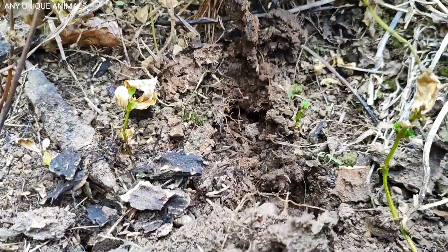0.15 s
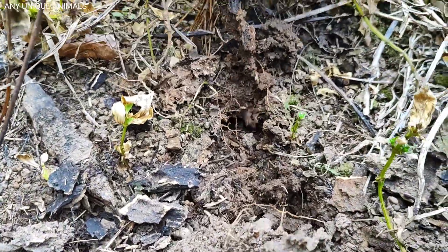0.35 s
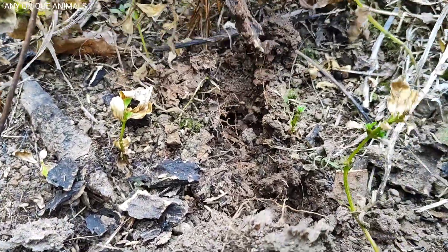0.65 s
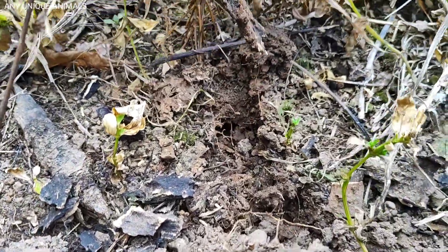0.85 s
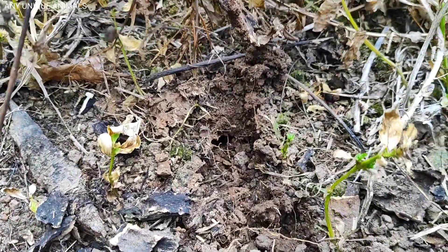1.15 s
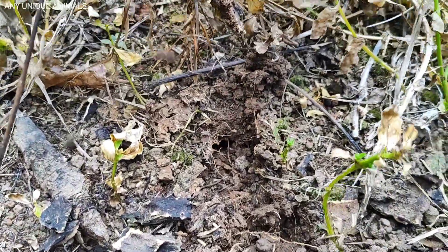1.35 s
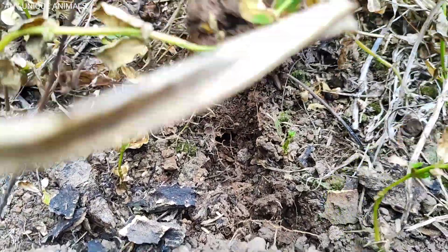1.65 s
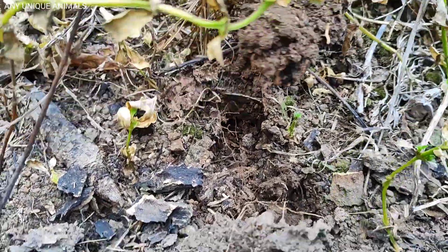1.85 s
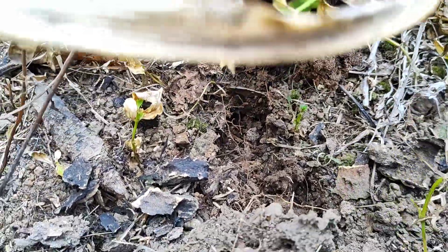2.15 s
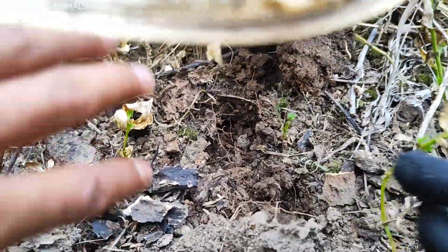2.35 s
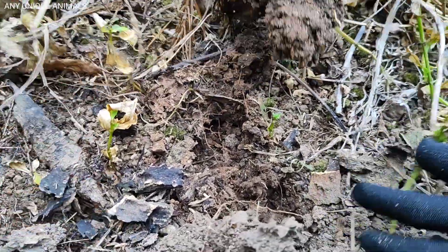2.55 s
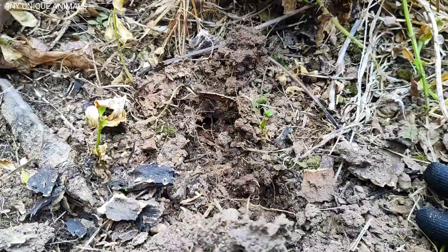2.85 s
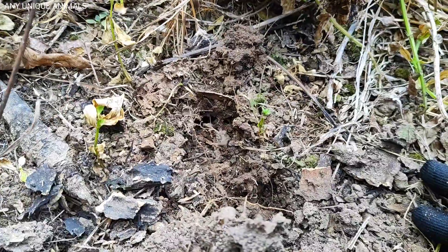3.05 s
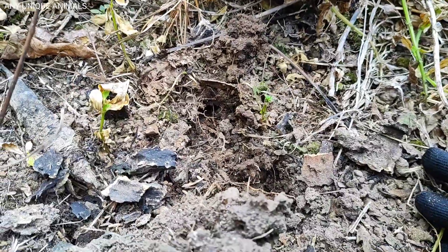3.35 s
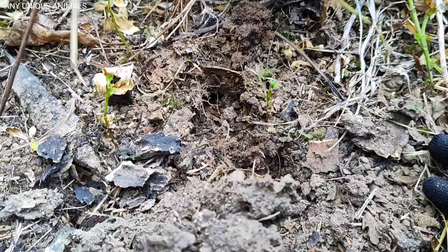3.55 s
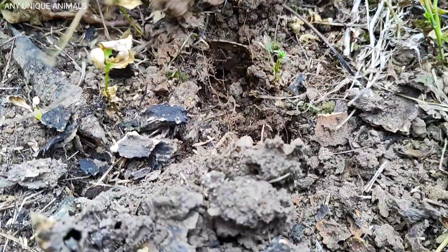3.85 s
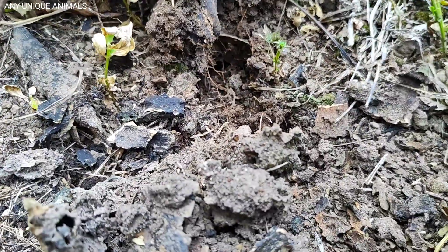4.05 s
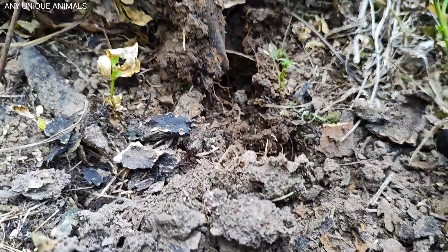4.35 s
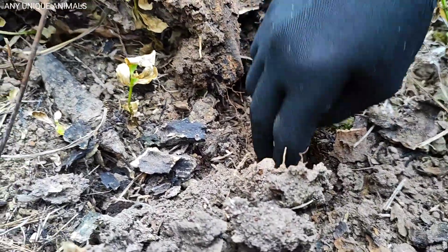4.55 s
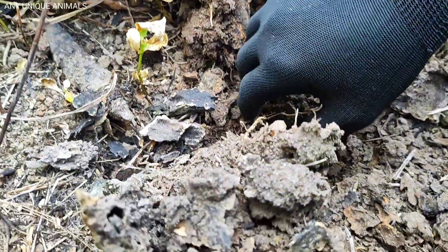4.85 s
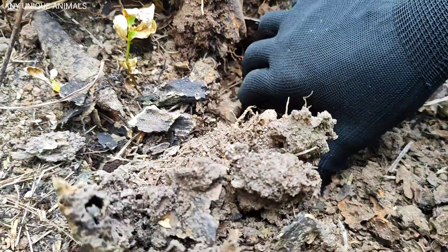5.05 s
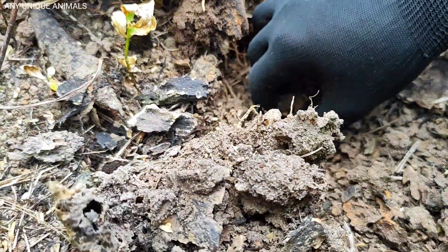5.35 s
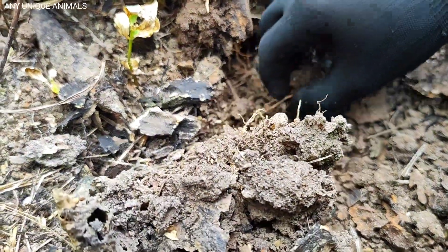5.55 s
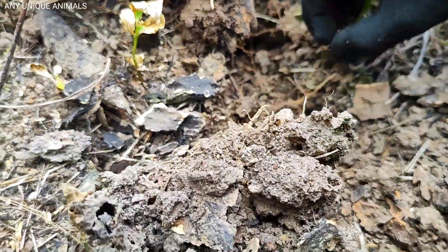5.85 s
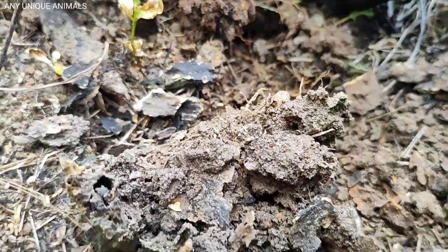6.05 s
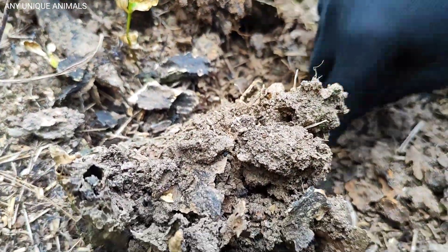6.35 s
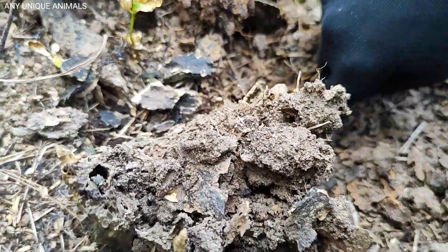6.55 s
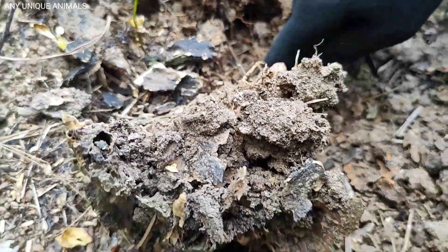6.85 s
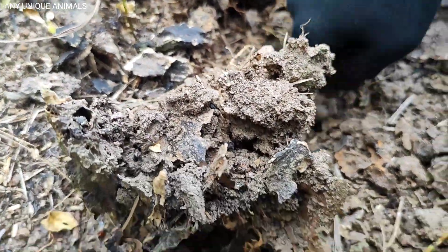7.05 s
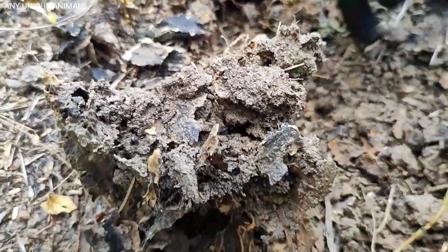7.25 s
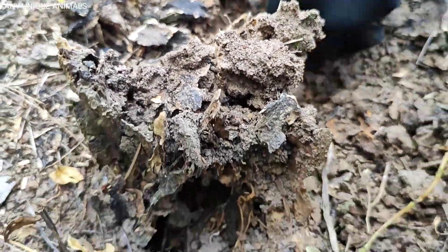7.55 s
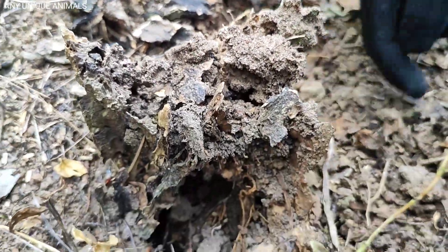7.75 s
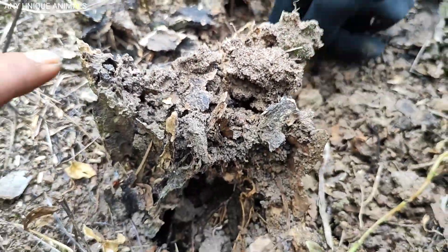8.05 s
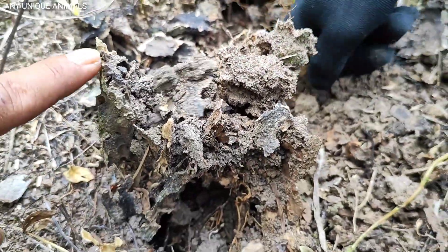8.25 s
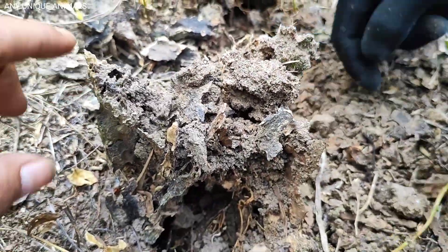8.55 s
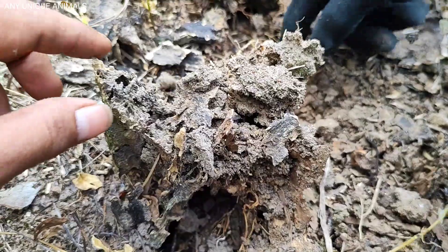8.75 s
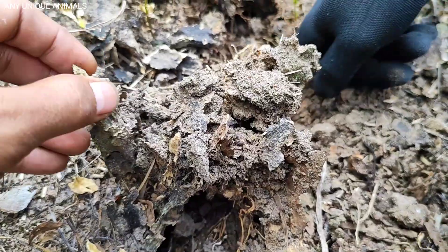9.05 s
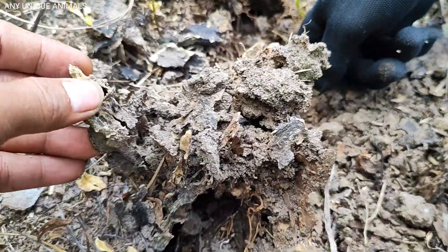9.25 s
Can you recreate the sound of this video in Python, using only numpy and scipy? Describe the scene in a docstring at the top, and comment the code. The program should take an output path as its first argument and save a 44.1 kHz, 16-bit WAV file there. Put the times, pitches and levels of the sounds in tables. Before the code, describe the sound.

Crisp leaf crackle, pattering dirt and sharp woody cracks build to a crunching tear, then thin into sparse picking while a bird chirps.

```python
"""Woodland floor: hands break rotten wood and dig through dry soil and leaf litter, close to a phone.
Leaves crackle and crumbs patter (noise gated by random ticks); wood and twigs crack (short fibre bursts)
and tear; loose wood knocks (decaying tones). A bird whistles short phrases and two long, faint, thin tones
sound near 7.9 kHz, perhaps an insect (all gliding sines with echoes), over a far rumble and drone (noise).
The two microphone ports colour the treble differently."""
import sys
import numpy as np
from scipy import signal
from scipy.fft import rfft, irfft, next_fast_len
from scipy.io import wavfile
from scipy.ndimage import uniform_filter1d, map_coordinates

SR = 44100
rng = np.random.default_rng(int(sys.argv[2]) if len(sys.argv) > 2 else 0)


def dump_mix(stems):
    """Bounce the given channels to the path in sys.argv[1] as a 16-bit WAV at rate SR."""
    frames = np.atleast_2d(stems).T  # one column per channel
    limited = np.clip(frames, -1, 1)  # hard clip at full scale
    pcm = np.round(limited * 32767).astype(np.int16)
    wavfile.write(sys.argv[1], SR, pcm)


N = 414981

# Levels marked * are shifted by the trims in the functions.
# steady rummaging of the hands: (time [s], leaf crackle* [dB], crumbling soil* [dB])
RUMMAGE = [(0, -36.5, -45), (.33, -55, -66), (.9, -41, -47.5), (1.2, -33.5, -44.5), (1.45, -31.5, -44),
           (1.77, -34, -45.5), (1.95, -46.5, -55.5), (2.25, -53, -60), (2.49, -61, -53.5),
           (2.6, -31, -39.5), (2.9, -32, -40.5), (3.07, -36, -44.5), (3.404, -30, -40.5),
           (3.417, -31, -45.5), (3.47, -47, -57), (3.544, -55, -60.5), (3.574, -38, -47), (3.89, -36, -43),
           (4.07, -49, -39), (4.17, -35.5, -47), (4.39, -39, -44), (4.71, -49.5, -57), (5.15, -55.5, -65),
           (5.7, -48.5, -58), (5.87, -46.5, -55.5), (6.42, -45, -55), (6.88, -61, -62.5), (7.2, -47, -57.5),
           (7.63, -61, -60), (8.01, -54.5, -63), (8.4, -56, -54), (8.75, -65, -60.5), (9.05, -64, -55),
           (9.41, -53, -43.5)]
# single scoops and scrapes, rise and fall over 10 dB:
# (peak time [s], rise [s], fall [s], leaf crackle* [dB], crumbling soil* [dB], dull earth [dB])
SCOOPS = [(.15, 0.088, 0.14, -35, -43, -56), (.51, 0.035, 0.17, -32, -43.5, -45),
          (.59, 0.21, 0.053, -25.5, -41, -47), (.688, 0.037, 0.11, -29.5, -43.5, -50),
          (1.008, 0.14, 0.16, -50, -56, -55), (1.792, 0.025, 0.036, -32.5, -42, -46),
          (1.97, 0.015, 0.0077, -35, -49, -51), (2.133, 0.11, 0.076, -36, -41, -49),
          (2.349, 0.17, 0.074, -52, -42.5, -47.5), (2.662, 0.039, 0.031, -26, -37.5, -38),
          (3.125, 0.02, 0.03, -40, -40, -41), (3.785, 0.06, 0.029, -51, -44, -43),
          (4.03, 0.13, 0.0091, -25, -37, -37), (4.133, 0.084, 0.021, -39, -42, -42),
          (4.378, 0.0082, 0.086, -35.5, -44.5, -52), (4.837, 0.06, 0.033, -44.5, -62, -59),
          (4.987, 0.027, 0.1, -57, -54, -50.5), (5.354, 0.19, 0.049, -49.5, -60, -61),
          (5.464, 0.13, 0.012, -62, -56, -64), (5.757, 0.022, 0.078, -37, -56, -57),
          (5.841, .015, 0.01, -48, -47.5, -57), (6.19, 0.1, 0.016, -36.5, -50, -54.5),
          (6.26, 0.045, 0.042, -36.5, -54, -52.5), (6.463, 0.019, 0.035, -48, -54.5, -58),
          (6.523, 0.013, 0.042, -44, -49.5, -45), (6.653, 0.051, 0.12, -45, -55.5, -53),
          (6.851, 0.0075, 0.015, -35.5, -53, -51), (7.06, 0.062, 0.52, -63, -61, -56),
          (7.238, 0.023, 0.006, -35.5, -45, -48), (7.38, 0.018, .06, -47, -61, -53.5),
          (7.455, 0.02, 0.064, -39.5, -53, -57), (7.573, 0.029, 0.038, -36, -50, -53),
          (7.832, 0.14, 0.096, -40.5, -50, -51.5), (8.299, 0.053, 0.0055, -59, -52, -51),
          (8.333, 0.0087, .013, -48, -56, -60), (8.523, 0.082, 0.03, -37.5, -48.5, -48),
          (8.642, 0.095, 0.022, -35.5, -46, -50), (8.968, 0.091, 0.086, -44.5, -51.5, -63),
          (9.115, 0.04, 0.015, -48, -50, -54), (9.16, 0.0029, 0.025, -27.5, -43, -60),
          (9.277, 0.018, 0.14, -38.5, -59, -50)]
# rummaged earth level when the soil column reads -51 dB; its slope against that column
EARTH_AT_DB, EARTH_DB_PER_SOIL_DB = -57, 1.06
# colours of leaf, soil crumbs and dull earth: (frequency [Hz], relative level [dB])
LEAF_COLOUR = [(4000, -15.5), (6500, -56), (8000, 4.5), (11000, 3.5), (15000, -7)]
SOIL_COLOUR = [(600, -24), (1400, -7.5), (2100, -2.5), (3200, -3.5), (4200, 0), (5200, -5), (6500, -4.5),
               (9000, -11.5)]
EARTH_COLOUR = [(100, -15), (300, -2), (700, 4.5), (1300, 5.5), (2500, -9)]
# two pulls that tear a slab of rotten wood loose: (peak time [s], level [dB])
PULLS = [(3.976, -18.5), (4.021, -17.5)]
PULL_10DB_S, PULL_BEND = 0.025, 2.6  # rise and fall time over 10 dB; roundness
# colour of the tearing slab: (frequency [Hz], relative level [dB])
SLAB_COLOUR = [(80, -17), (200, -11), (800, 2), (1500, 10), (2500, 7.5), (6000, 3), (8000, -4.5),
               (14000, -12.5)]
# cracks: (time [s], level* [dB], twig part re level [dB], wood part* re level [dB])
CRACKS = [(0.15, 5, -29, -35), (0.2173, -4, -15, -42), (0.557, 4, -21, -29), (0.589, 6, -38, -33),
          (0.7528, -8, -8, -29), (0.851, -1, -16, -43), (1.0086, -19, -27, -18), (1.0215, -6, -22, -38),
          (1.092, -4.5, -25, -38), (1.114, -3, -20, -43), (1.134, -3, -14, -28), (1.196, -7, -24, -38),
          (1.2207, -8.5, -10, -13), (1.317, -5, -27, -33), (1.337, -7, -27, -38), (1.3557, -1, -25, -30),
          (1.384, 5, -16, -32), (1.448, -8, -25, -35), (1.477, -5, -28, -35), (1.58, -1, -39, -48),
          (1.6193, -1, -26, -45), (1.873, -11, -22, -28), (1.9555, -19, -10, -34), (1.9714, -16, -10, -30),
          (2.1732, -17, -2, -14), (2.276, -12, -19, -24), (2.573, -10.5, 0, -16.5),
          (2.7232, 10.5, -17, -51), (2.7317, -10, -6, -40), (2.7418, -2, -17, -34), (2.8, 2, -22, -20.5),
          (2.867, -17, -10, -33), (2.9747, 5, -37, -47), (3.348, -8, -12, -17), (3.393, -6, -22, -43),
          (3.4068, 7.5, -19, -50), (3.4381, -0.5, -13, -33), (3.466, 0, -13, -29), (3.4884, -18, -16, -39),
          (3.558, -10, -29, -49), (3.5637, -2, -27, -49), (3.814, -7, -0.5, -18), (4.1118, -16, -10, -14),
          (4.192, -9, -14, -36), (4.219, -4, -12, -48), (4.2695, -18, 0, -12), (4.4787, -28, -9, 1),
          (5.0255, -38, -2, -16), (5.4512, -13, -23, -34), (5.5307, -13, -19, -33), (5.704, -13, -19, -30),
          (5.744, -8, -21, -32), (5.834, 2, -24, -52), (5.994, -10, -22, -31), (6.0155, -26, 0, -29),
          (6.166, -7, -21, -28), (6.5103, -21, -7, -37), (6.529, -7.5, -13, -27), (6.761, -18.5, -5.5, -16),
          (6.8973, -24, -16, -21), (6.9214, -14, -26, -29), (7.0287, -28, 5, -24), (7.2265, -10, -12, -34),
          (7.371, -28, -3, -13), (7.444, -11, -31, -40), (7.5652, -18, -23, -16), (7.74, -15, -18, -18),
          (7.9168, -4, -20.5, -33), (8.2903, -26.5, 5, -14), (8.3725, -15.5, -9, -29),
          (8.4347, -16, 4.5, -20), (8.5132, -3, -15.5, -22), (8.5805, 0, -24, -27), (8.586, 2, -19, -44),
          (8.6167, -4, -21, -27), (8.85, -16, -27, -30), (9.0566, -17.5, -3, -21), (9.099, -9, -10, -36),
          (9.1761, 1.5, 2.5, -17.5), (9.2217, -8, 1.5, -38), (9.2264, -10.5, 7.5, -22),
          (9.292, -14, 3, -28), (9.3407, -11.5, 8.5, -12.5), (9.35, -16, 7, -26), (9.3806, 2, -17, -36)]
# colours of the twig and wood parts: (frequency [Hz], gain [dB])
TWIG_COLOUR = [(600, -23), (1400, -19.5), (2100, -3.5), (3200, -12), (4200, 0), (5200, -4.5), (6500, -8.5),
               (9000, -22.5)]
WOOD_COLOUR = [(100, -3), (400, -15), (700, 3), (1100, -8), (2500, -9.5)]
# loose bits of hollow wood: (time [s], pitch [Hz], level [dB], t60 [s])
KNOCKS = [(4.34, 1100, -35, 0.013), (4.427, 1360, -24.5, 0.036), (4.472, 1570, -28, 0.018),
          (4.481, 1600, -21.5, 0.029), (6.292, 890, -33.5, 0.029), (7.058, 625, -40.5, 0.043),
          (8.543, 715, -35, 0.05), (8.58, 1450, -29, .04)]
# bird notes, and two long faint thin high tones near 7.9 kHz, perhaps an insect;
# glide then hold, before random waver: (start [s], length [s], first pitch [Hz],
# last pitch [Hz], gliding share of the tone [0-1], level [dB], echo re direct sound [dB])
TONES = [(0.295, 0.043, 2040, 2000, .9, -46.5, -10), (0.713, 0.031, 3100, 2460, 0.83, -42.5, 8),
         (0.816, .022, 2410, 3050, .7, -40, 4), (0.863, 0.049, 3550, 3050, 0.54, -40.5, 7),
         (0.914, 0.049, 3120, 2720, 0.32, -41, -2), (1.703, 0.045, 2253, 1880, 0.85, -46, 2),
         (2.019, 0.054, 2014, 2015, 0.8, -45, -5), (2.186, 0.03, 3300, 2560, 0.66, -33, -7),
         (2.293, 0.029, 2050, 1990, .9, -39, -1), (2.328, 0.052, 3730, 3066, 0.49, -34, 5),
         (2.34, .032, 2050, 1930, 0.86, -43, -7), (2.383, .018, 2650, 2780, 0.79, -29, -2),
         (5.334, 0.049, 1970, 2120, 0.97, -53, 5), (5.282, 0.31, 7960, 7760, 1, -58, 6),
         (5.597, 0.021, 2280, 2070, 0.68, -37.5, -2), (5.653, 0.064, 3100, 2026, 0.73, -39, 3),
         (5.677, 0.027, 3250, 2680, 1, -49, 8), (5.727, 0.029, 1980, 2430, 0.89, -42, -1),
         (5.761, 0.048, 2480, 2360, .9, -47.5, 4), (5.826, 0.04, 2150, 2250, .8, -43, -5),
         (8.251, 0.078, 2350, 2220, 0.73, -52, 1), (8.66, 0.21, 7900, 7820, 1, -56, 5),
         (8.879, 0.032, 4350, 4130, .7, -44, 9), (8.977, 0.031, 2950, 2290, 1, -30.5, 1),
         (9.072, 0.018, 2080, 2970, 0.88, -32.5, 5.5), (9.096, 0.036, 2555, 2340, 0.98, -42, 6),
         (9.126, 0.022, 3630, 3470, 0.5, -31, 3), (9.144, .026, 3340, 3040, 0.46, -30, 3),
         (9.166, .056, 3180, 2860, 0.328, -29.5, -2)]
# far background: (time [s], rumble level* [dB], drone level* [dB])
FAR_LEVELS = [(0, -51, -37.5), (.25, -47.5, -51), (.55, -56.5, -81), (1.02, -49.5, -42.5),
              (1.3, -52.5, -50), (2.1, -52, -68), (2.4, -52.5, -46), (2.75, -49, -56.5), (3.45, -56.5, -56),
              (3.52, -59, -82), (4.15, -50.5, -55.5), (5.1, -56.5, -64), (5.4, -53, -45.5),
              (5.62, -52, -65), (5.9, -52.5, -51.5), (6.6, -53, -59), (8.05, -52, -47), (8.6, -52, -59.5),
              (9.41, -48.5, -46.5)]
# colours of rumble with open air, and of the drone: (frequency [Hz], relative level [dB])
AIR_COLOUR = [(20, -5.5), (40, -14.5), (110, -0.5), (180, -0.5), (300, -12.5), (800, -15), (1300, -21),
              (2500, -19), (6500, -26), (9000, -66)]
DRONE_COLOUR = [(40, -38), (58, -2.5), (74, -0.5), (90, -5.5), (120, -43)]
# left-right likeness of the rumble and air: (frequency [Hz], correlation [0-1])
AIR_ALIKE = [(60, 0.57), (200, 0.74), (500, 0.26), (1500, 0.03)]
# port responses, the left notched, the right with strong treble peaks: (frequency [Hz], gain [dB])
LEFT_PORT = [(400, 2.5), (1200, 2), (6800, 0.5), (7600, 0), (8200, -38), (8700, 3), (9400, -3), (12000, 7),
             (14200, 5)]
RIGHT_PORT = [(6800, 1.7), (7600, 0.55), (8200, 0.59), (8650, 13.3), (9250, 20.9), (10100, 15.3),
              (11100, 12.8), (12100, 18.4), (13300, 12.4), (14200, 4.9)]
PORT_LAG_SAMPLES = 13  # right port after left, for cracks and knocks
TOP_HZ = 14400


def amp(db):
    """Amplitude factor of a level in dB."""
    return 10 ** (np.asarray(db) / 20)


def unit(x):
    """x scaled to rms 1."""
    return x / np.sqrt(np.mean(x ** 2) + 1e-20)


def along(points, hz):
    """(Hz, value) points interpolated on a log frequency axis."""
    f, v = np.transpose(points)
    return np.interp(np.log(hz + 1), np.log(f + 1), v)


def curves(rows):
    """One value per sample for each column after the time."""
    s, *cols = np.transpose(rows)
    return [np.interp(np.arange(N) / SR, s, c) for c in cols]


def wobble(knots_per_s):
    """Smooth random curve through normal random knots."""
    knots = rng.standard_normal(int(N * knots_per_s / SR) + 4)
    return map_coordinates(knots, [np.arange(N) * knots_per_s / SR])


def filtered(x, response):
    """x times a response of frequency, by FFT with zero padding."""
    m = next_fast_len(N + 8192)
    return irfft(rfft(x, m) * response(np.fft.rfftfreq(m, 1 / SR)), m)[..., :N]


def causal(points, size=2048):
    """Minimum-phase impulse response of a (Hz, dB) colour, by folding the cepstrum."""
    gain = amp(along(points, np.fft.rfftfreq(size, 1 / SR)))
    cepstrum = irfft(np.log(gain), size)
    cepstrum[1:size // 2] *= 2
    cepstrum[size // 2 + 1:] = 0
    return irfft(np.exp(rfft(cepstrum)), size)[:size // 2]


def noise(spectrum, alike, lag_s=0, patchy_db=0):
    """Stereo noise of rms 1, patchy in time and frequency; the right port is lag_s late."""
    z = signal.stft(rng.standard_normal((2, N)), nperseg=256)[2]
    field = uniform_filter1d(rng.standard_normal(z.shape[1:]), size=3, axis=0)
    field = uniform_filter1d(field, size=6, axis=1)
    pair = signal.istft(z * amp(patchy_db * unit(field)), nperseg=256)[1][:, :N]

    def mid_side_gains(hz):
        angle = np.arccos(np.clip(along(alike, hz), 0, 1)) / 2  # correlation = cos(2 angle)
        return amp(along(spectrum, hz)) * [np.cos(angle), np.sin(angle)]

    mid, side = filtered(pair, mid_side_gains)
    return unit(np.array([mid + side, np.roll(mid - side, round(lag_s * SR))]))


def bursts(spikes, t60_s):
    """Each spike becomes a sudden rise with an exponential fall."""
    return signal.lfilter([1], [1, -amp(-60 / (t60_s * SR))], spikes)


def grains(rate_per_s, spread_db, t60_s, bed):
    """Envelope of rms 1: random ticks of uneven size over a constant bed (fused tiny ticks)."""
    sizes = amp(spread_db * rng.exponential(size=N).clip(0, 3.2))
    ticks = (rng.random(N) < rate_per_s / SR) * sizes
    return unit(unit(bursts(ticks, t60_s)) + bed)


def swells(peak_s, rise_s, fall_s, db, bend):
    """Power sum [dB] of swells; bend 1 is a pointed peak, more is rounder with steeper ends."""
    power, t = np.full(N, 1e-14), np.arange(N) / SR
    for s, rise, fall, level in np.broadcast(peak_s, rise_s, fall_s, db):
        near = slice(max(0, round((s - 5 * rise) * SR)), round((s + 5 * fall) * SR))
        away = np.abs(t[near] - s) / np.where(t[near] < s, rise, fall)
        power[near] += amp(level - 10 * away ** bend) ** 2
    return 10 * np.log10(power)


def effort():
    """Leaf, soil and earth levels [dB]: scoops over rummaging, in which the earth follows the soil."""
    s, rise, fall, *peaks = np.transpose(SCOOPS)
    leaf_db, soil_db = curves(RUMMAGE)
    earth_db = EARTH_AT_DB + EARTH_DB_PER_SOIL_DB * (soil_db + 51.0)
    levels_db = []
    for bed_db, peak_db in zip((leaf_db, soil_db, earth_db), peaks):
        scoop_db = swells(s, rise, fall, peak_db, bend=2.22)
        levels_db.append(10 * np.log10(amp(bed_db) ** 2 + amp(scoop_db) ** 2))
    return levels_db


def digging():
    """Leaves tick sharply, soil crumbs more softly; they give way in clumps that start suddenly."""
    leaf_trim_db, soil_trim_db = -9.5, 6.0
    leaf_db, soil_db, earth_db = effort()
    leaf = noise(LEAF_COLOUR, [(8000, 0.071)], lag_s=.0003, patchy_db=2.5)
    soil = noise(SOIL_COLOUR, [(1500, 0.071), (6000, 0.021)], lag_s=.0003, patchy_db=2.5)
    earth = noise(EARTH_COLOUR, [(300, 0.97), (1400, 0.35)], lag_s=0.00025, patchy_db=3.5)
    clumps = grains(rate_per_s=50, spread_db=2.5, t60_s=.07, bed=2.6)
    ticks = grains(rate_per_s=330, spread_db=3.4, t60_s=.007, bed=1.1)
    crumbs = grains(rate_per_s=300, spread_db=3, t60_s=.012, bed=1.3)
    crackle = amp(leaf_db + leaf_trim_db) * ticks * leaf
    patter = amp(soil_db + soil_trim_db) * unit(ticks + crumbs) * soil
    thud = amp(earth_db) * unit(crumbs + 0.26 * ticks) * earth
    return clumps * (crackle + patter + thud)


def tear():
    """Fibres part so densely that they merge into one broad crunch from a single spot."""
    fibres = grains(rate_per_s=900, spread_db=2, t60_s=.006, bed=1.5)
    s, db = np.transpose(PULLS)
    pull_db = swells(s, PULL_10DB_S, PULL_10DB_S, db, bend=PULL_BEND)
    return amp(pull_db) * fibres * noise(SLAB_COLOUR, [(1500, 0.83), (9000, 0.18)], lag_s=.00032)


def cracks():
    """Fibres snap for a few milliseconds; the thicker parts sound lower and longer."""
    bright_trim_db, wood_trim_db = -18.0, 7.0
    t = np.arange(SR // 20) / SR
    # axes: crack, part (bright, twig, wood), port, sample
    snaps = np.sign(rng.standard_normal((len(CRACKS), 3, 2, len(t))))
    # twig and wood: slight left-right likeness
    snaps[:, 1:, 1] = 0.079 * snaps[:, 1:, 0] + 0.85 * snaps[:, 1:, 1]
    snaps *= np.clip(t / 0.0018, .15, 1) ** 1.65  # a few small fibres go first
    snaps[..., 40] = 5.2  # the main fibre gives a sharp click
    parts = np.zeros((3, 2, N + SR))
    for (s, db, twig_db, wood_db), snap in zip(CRACKS, snaps):
        t60_s = 0.0082 * amp(0.16 * (twig_db + 28.0))  # more twig, longer break
        part_t60_s = t60_s * np.array([[1], [1.3], [2.2]])
        part_db = np.array([[db + bright_trim_db], [db + twig_db], [db + wood_db + wood_trim_db]])
        fall = amp(part_db - 60 * t / part_t60_s)
        for port, lag in enumerate((0, PORT_LAG_SAMPLES)):
            parts[:, port, round(s * SR) + lag:][:, :len(t)] += fall * snap[:, port]
    colours = np.array([causal(c) for c in (LEAF_COLOUR, TWIG_COLOUR, WOOD_COLOUR)])
    return signal.fftconvolve(parts, colours[:, None], axes=2)[..., :N].sum(0)


def knocks():
    """A crumbly blow of a few milliseconds sets off a quickly dying note and a weaker one above it."""
    out, t = np.zeros(N + SR), np.arange(SR // 10) / SR
    blows = rng.standard_normal((len(KNOCKS), len(t))) * amp(-60 * t / 0.017)
    for (s, hz, db, t60_s), blow in zip(KNOCKS, blows):
        tones = np.sin(2 * np.pi * hz * t) + 0.2 * np.sin(2 * np.pi * 2.11 * hz * t)
        ring = amp(db - 60 * t / t60_s) * tones
        knock = signal.fftconvolve(ring, blow / np.linalg.norm(blow))
        out[round(s * SR):][:len(t)] += knock[:len(t)]
    return np.array([out[:N], np.roll(out, PORT_LAG_SAMPLES)[:N]])


def bird_and_high_tones():
    """Sines waver in pitch and strength, swell as the glide ends, and echo differently each time."""
    song, t = np.zeros((2, N + SR)), np.arange(SR // 2) / SR
    for s, length_s, first_hz, last_hz, share, db, echo_db in TONES:
        u = np.linspace(0, 1, round(length_s * SR))
        glide = .5 + .5 * np.cos(np.pi * np.clip(u / share, 0, 1))  # 1 at the start, 0 in the hold
        pitch_hz = last_hz + (first_hz - last_hz) * glide
        knots = 3 + round(length_s / .004)
        knot_u = np.linspace(0, 1, knots)
        pitch_hz *= 1 + 0.022 * np.interp(u, knot_u, rng.standard_normal(knots))
        waver_db = 3 * np.interp(u, knot_u, rng.standard_normal(knots)) - 3.5 * glide
        sine = np.sin(2 * np.pi * np.cumsum(pitch_hz) / SR)
        tone = amp(db + waver_db) * np.sin(np.pi * u) ** .5 * sine
        # echo from the trees: fast and slow decays with a soft onset
        fade = (amp(-60 * t / 0.65) + 1.5 * amp(-60 * t / 0.12)) * (1 - np.exp(-t / .007))
        trees = amp(echo_db) * unit(fade * rng.standard_normal((2, len(t)))) / np.sqrt(len(t))
        trees[:, 0] = amp([-1.5, 1.5])  # direct sound
        heard = signal.fftconvolve(tone[None], trees, axes=1)
        song[:, round(s * SR):][:, :heard.shape[1]] += heard
    return song[:, :N]


def far():
    """Far rumble with open-air hiss, and a low drone: coloured noises of wandering level."""
    rumble_trim_db, drone_trim_db = 1.5, -4.0
    rumble_db, drone_db = curves(FAR_LEVELS)
    rumble_gain = amp(rumble_db + rumble_trim_db + 2.16 * wobble(5))
    drone_gain = amp(drone_db + drone_trim_db + 1.5 * wobble(1.86))
    rumble = rumble_gain * noise(AIR_COLOUR, AIR_ALIKE)
    return rumble + drone_gain * noise(DRONE_COLOUR, [(70, 0.9)])


def scene():
    """All sources summed at the two ports."""
    return digging() + tear() + cracks() + knocks() + bird_and_high_tones() + far()


def record(dry):
    """Port colours, then soft limiting of peaks, then a sharp cut at TOP_HZ."""
    x = signal.fftconvolve(dry, [causal(LEFT_PORT), causal(RIGHT_PORT)], axes=1)[:, :N]
    x = x / (1 + np.abs(x / .75) ** 6) ** (1 / 6)  # saturates towards 0.75
    return filtered(x, lambda hz: hz < TOP_HZ)


dry = scene()
out = record(dry)
dump_mix(out)
```